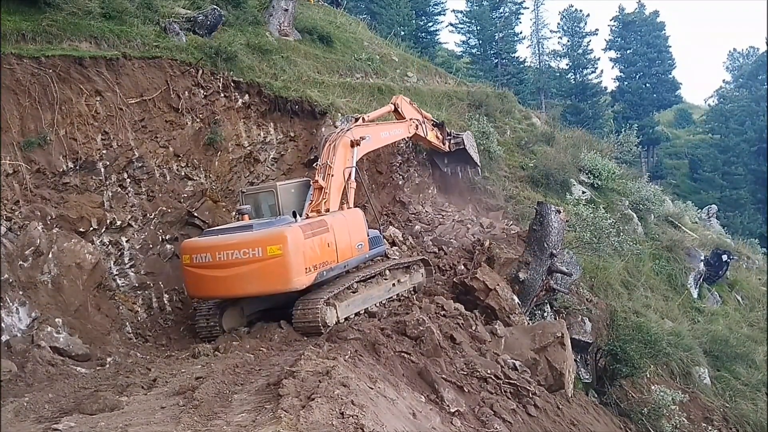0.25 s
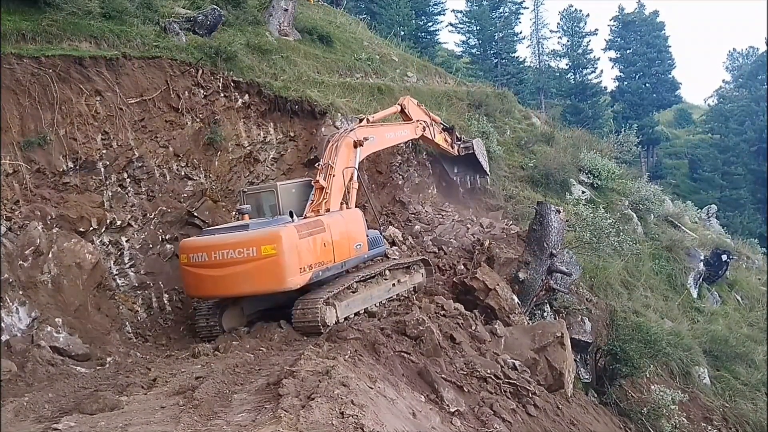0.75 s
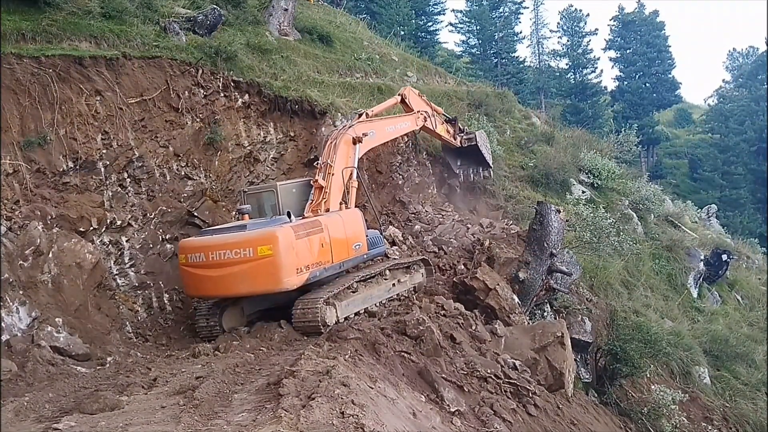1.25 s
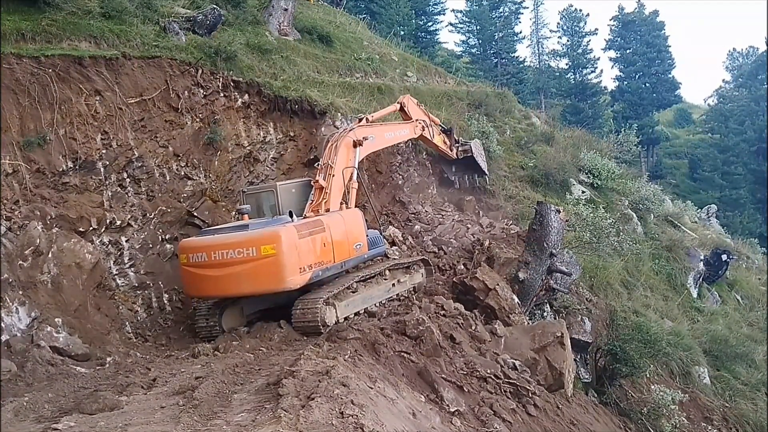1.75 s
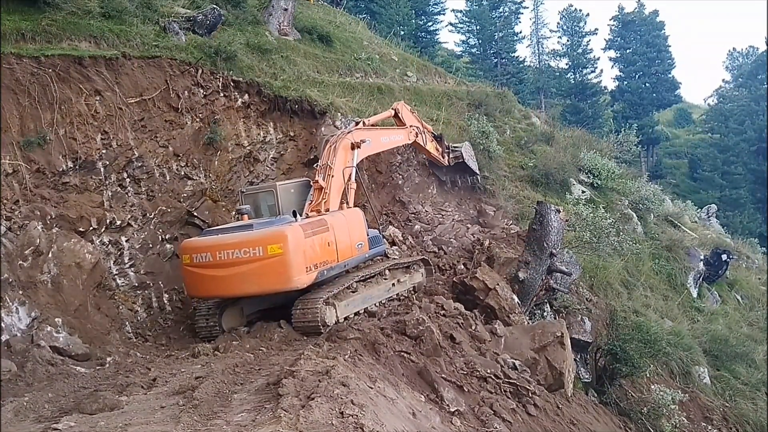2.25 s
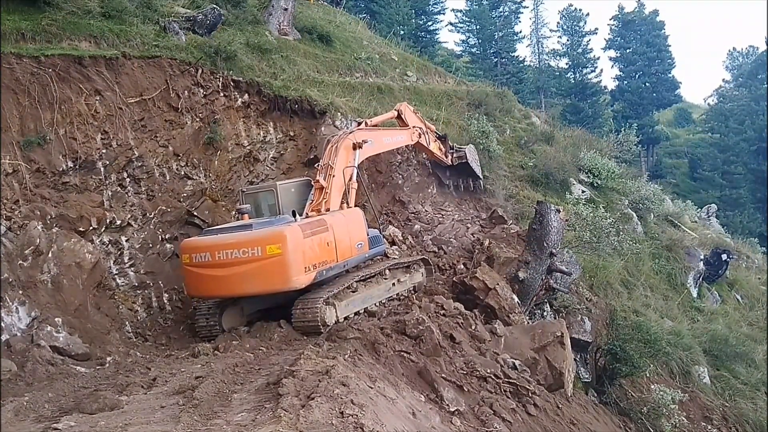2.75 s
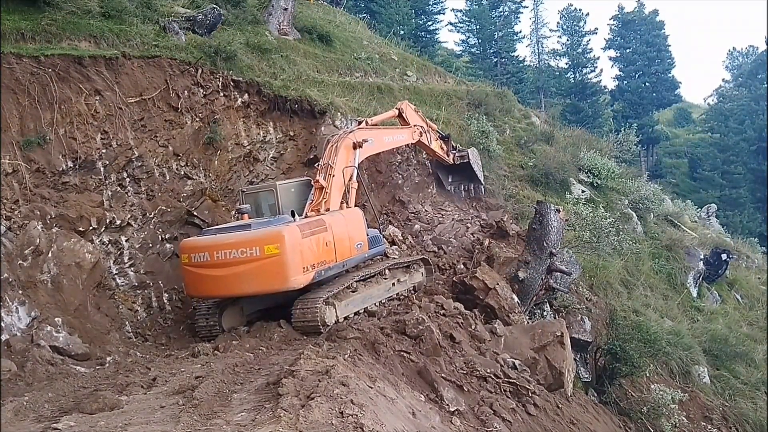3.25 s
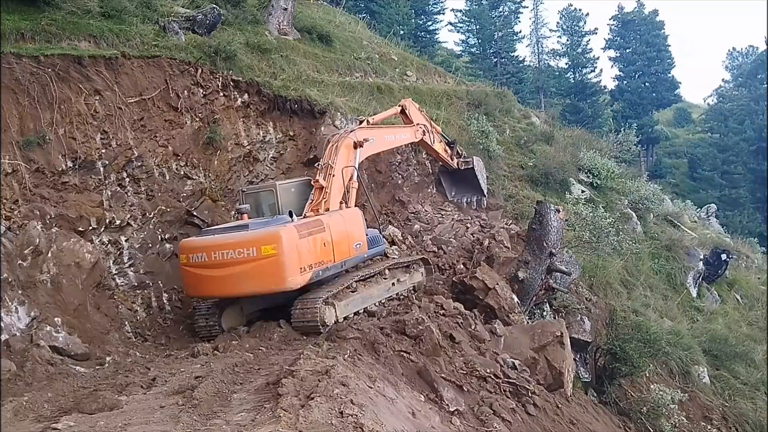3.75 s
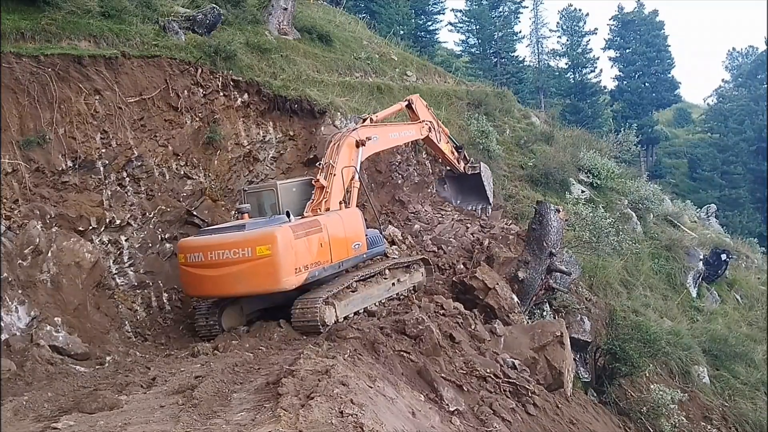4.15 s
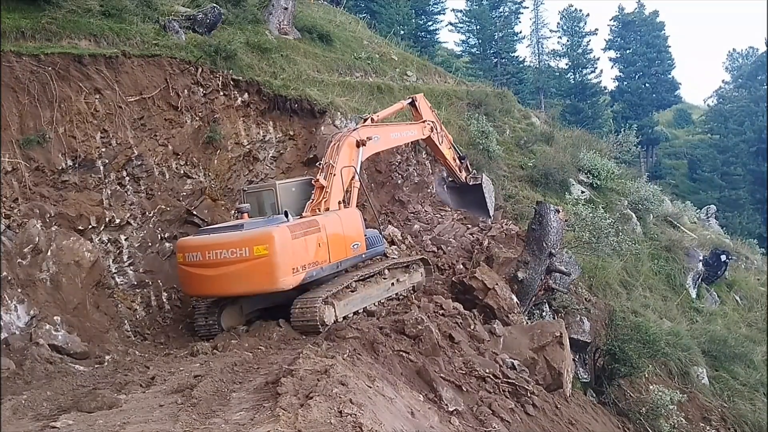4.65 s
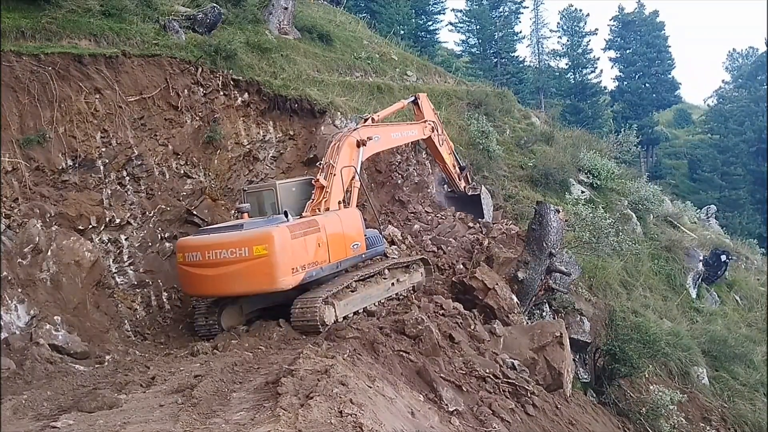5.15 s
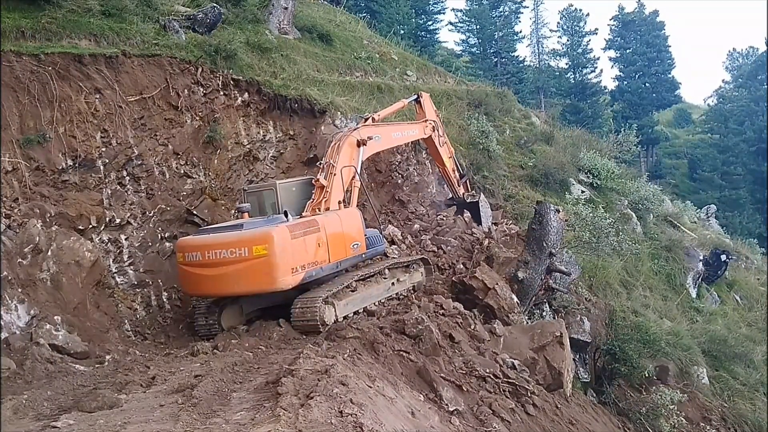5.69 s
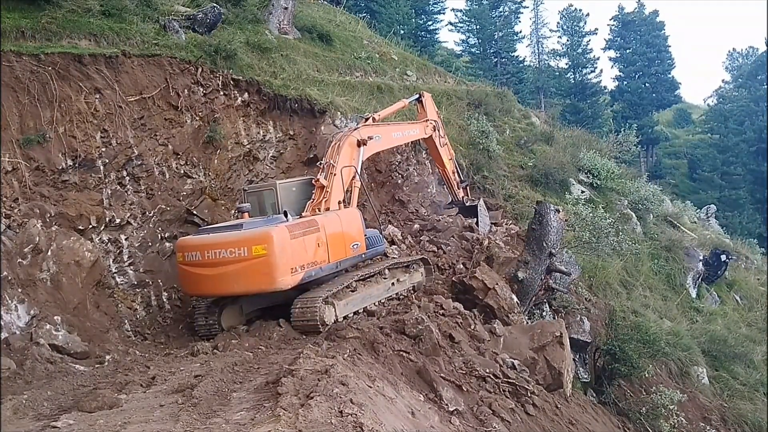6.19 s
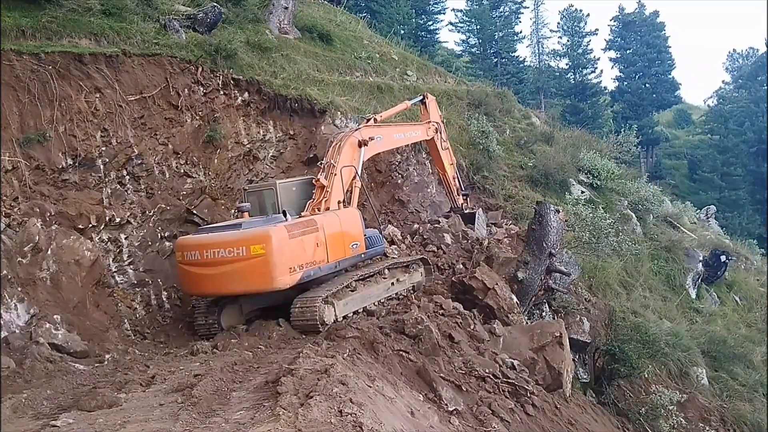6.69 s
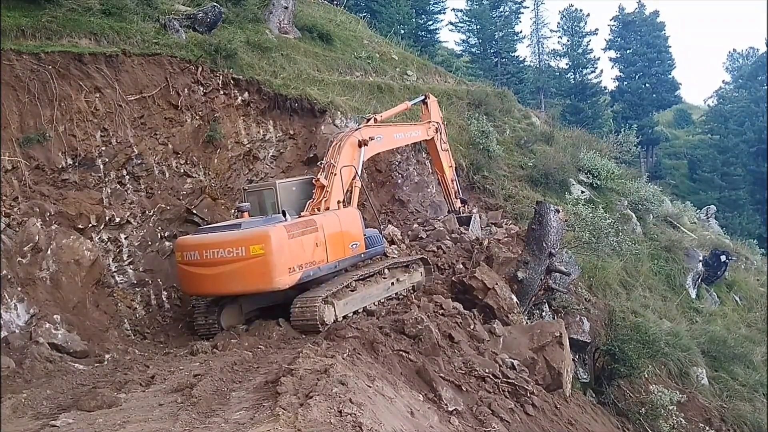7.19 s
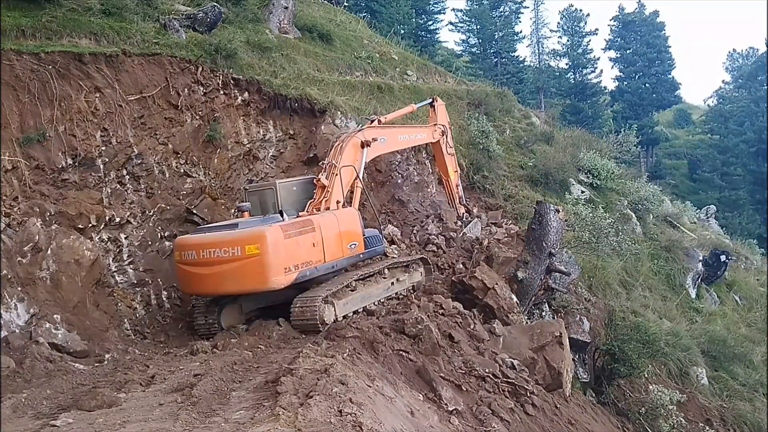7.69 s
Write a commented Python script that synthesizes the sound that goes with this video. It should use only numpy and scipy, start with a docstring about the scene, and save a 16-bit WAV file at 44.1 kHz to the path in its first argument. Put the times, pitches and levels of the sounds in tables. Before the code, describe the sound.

Outdoors by a cut earth bank, a loaded diesel engine growls continuously, its pitch sagging and recovering slightly. The bucket teeth scrape and groan through packed soil; stones crack, thud and clatter on dull-ringing steel in uneven bursts, heaviest around four to five seconds. Gravel trickles after each slide. Later the digging nearly stops and the engine dominates. Wide stereo pickup, some way from the machine, with brief rough echoes.

```python
"""A tracked excavator rakes rock out of an earth bank: diesel tones, exhaust noise, whines throughout.
Rocks knock on the steel bucket from 0.3 s, again near 1.1 s and from 2.5 to 3.4 s, thickest at 3.8-4.8 s,
then sparsely to 7.9 s. Knocks are noise bursts exciting resonances; stones, gravel and grit are random
impulses, filtered; earth is low noise; tooth strokes set the arm groaning. The exhaust dips near 7.4 s.
The slope scatters the digging as short noise echoes, the low rumble of earth excepted."""
import sys
import numpy as np
from scipy import signal
from scipy.fft import rfft, irfft, next_fast_len
from scipy.io import wavfile
from scipy.ndimage import uniform_filter1d

SR = 44100
rng = np.random.default_rng(int(sys.argv[2]) if len(sys.argv) > 2 else 0)


def wav_out(sig):
    """Save sig, one row per channel (or a flat mono array), as 16-bit PCM at SR to the path in sys.argv[1]."""
    wavfile.write(sys.argv[1], SR, np.round(np.clip(np.atleast_2d(sig).T, -1, 1) * 32767).astype(np.int16))


N = 349713
T = np.arange(N) / SR
SIZE = next_fast_len(N + SR, real=True)
HZ = np.maximum(np.arange(SIZE // 2 + 1) * SR / SIZE, 1)


def from_db(db):
    """Decibels to gain."""
    return 10 ** (np.asarray(db) / 20)


def rms_one(x):
    """Scale to unit power."""
    return x / np.sqrt(np.mean(x ** 2) + 1e-20)


def in_time(rows):
    """Each column of a (t, values) table, interpolated at every sample."""
    s, *columns = np.transpose(rows)
    return [np.interp(T, s, column) for column in columns]


def gains(points):
    """A (Hz, dB) table as gain at every FFT frequency, interpolated over log frequency."""
    hz, db = np.transpose(points)
    return from_db(np.interp(np.log(HZ), np.log(hz), db))


def colour(x, points):
    """Causal, minimum-phase filter with the given spectrum."""
    cepstrum = irfft(np.log(gains(points)), SIZE)
    # fold the cepstrum onto positive time
    cepstrum[1:SIZE // 2] *= 2
    cepstrum[SIZE // 2 + 1:] = 0
    response = np.exp(rfft(cepstrum))
    return irfft(rfft(x, SIZE) * response, SIZE)[..., :N]


def drift(rate_hz):
    """Smooth random wandering with spread 1: two-pole low-passed noise, run at SR / 40."""
    r = np.exp(-80 * np.pi * rate_hz / SR)
    noise = rng.standard_normal(N // 40 + 2002)
    slow = signal.lfilter([1], [1, -2 * r, r * r], noise)[2000:]
    return np.interp(np.arange(N) / 40, np.arange(len(slow)), rms_one(slow))


def resonate(x, hz, width_hz):
    """One two-pole resonance, gain 1 at its top."""
    r = np.exp(-np.pi * width_hz / SR)
    zeros = np.array([1, 0, -1]) * (1 - r * r) / 2
    poles = [1, -2 * r * np.cos(2 * np.pi * hz / SR), r * r]
    return signal.lfilter(zeros, poles, x + 1e-18)


def passband(x, hz, kind):
    """Second-order low- or high-pass."""
    sos = signal.butter(2, min(hz, .45 * SR), kind, fs=SR, output="sos")
    return signal.sosfilt(sos, x + 1e-18)


def brighten(x, gain):
    """First-order shelf that scales the part above 700 Hz."""
    dull = signal.lfilter(*signal.butter(1, 700, fs=SR), x)
    return dull + gain * (x - dull)


def grains(per_s, spread_db):
    """Random contacts of uneven size and sign, with about unit power at any rate."""
    sizes = from_db(spread_db * np.minimum(rng.exponential(1, N), 3)) * rng.choice([-1, 1], N)
    struck = rng.random(N) < per_s / SR
    return rms_one(sizes * struck / np.sqrt(per_s))


def swell(start_s, length_s, attack_s, release_s):
    """Envelope that rises exponentially to 1 at the start, holds, and dies away."""
    before_s = np.maximum(start_s - T, 0)
    after_s = np.maximum(T - start_s - length_s, 0)
    return np.exp(-before_s / max(attack_s, 1e-3) - after_s / max(release_s, 1e-3))


# engine speed, sagging as the bucket bites, overshooting as it comes free: t/s, firing rate/Hz
FIRING_RATE = [(0, 82), (0.25, 82.0), (0.5, 79.5), (0.75, 85), (1.3, 76.6), (1.55, 79), (1.9, 79.6),
               (2.4, 77), (2.9, 81), (3.08, 77.5), (3.35, 82.6), (3.6, 79.9), (4, 80.2), (4.6, 77),
               (5.2, 82), (5.9, 78), (6.55, 80.2), (7.6, 77)]
# clean tones; belt-driven parts sit between the orders: multiple of firing rate, level/dB, waver depth
ENGINE_TONES = [(1, -29, 0.43), (2, -36, 0.62), (2.22, -37.5, 1.8), (3.099, -46, 0.71), (4, -51.5, 0.64),
                (4.705, -44, .9), (5, -70, .5)]
HUNT_HZ, HUNT_RATE_HZ = 0.305, 2.7   # governor hunting about the speed
WAVER_DB, WAVER_RATE_HZ = 2, 11.4   # per unit of waver depth


def engine_tones():
    """Firing orders and belt-driven parts: sines locked to the firing rate, wavering in phase and level."""
    firing_hz, = in_time(FIRING_RATE)
    turns = np.cumsum(firing_hz + HUNT_HZ * drift(HUNT_RATE_HZ)) / SR
    tones = 0
    for multiple, db, waver in ENGINE_TONES:
        phase = 2 * np.pi * (multiple * turns + rng.random()) + .5 * waver * drift(4)
        level_db = db + WAVER_DB * waver * drift(WAVER_RATE_HZ)
        tones = tones + np.sqrt(2) * np.sin(phase) * from_db(level_db)
    return tones * np.array([[1], [0]])   # mid only


# engine load as exhaust level: t/s, relative level/dB
EXHAUST_LOAD = [(0, -23.5), (2.9, -25), (3.2, -23), (4.7, -22.5), (4.9, -25), (6.2, -25), (6.65, -21.5),
                (7.2, -25.5), (7.37, -31), (7.52, -23.5), (7.93, -22)]
# swells and slumps as the governor catches the load: t/s, level change/dB
EXHAUST_SURGES = [(.03, 2), (.61, 8), (.8, 7), (.91, -1.5), (1.05, -9), (1.38, 5.5), (1.71, 6.5), (1.8, -4),
                  (2.07, 9), (2.48, 6.5), (3.04, -5), (3.16, 8.5), (3.57, 2.5), (4.61, 6.5), (4.7, 3.5),
                  (5.28, 6.5), (5.75, 6.5), (6.58, 3.5), (6.83, -10)]
# exhaust pipe and silencer: f/Hz, width of one stage/Hz, relative level/dB
PIPE_MODES = [(139.4, 22.8, -8.5), (172.3, 25.4, -3.5), (240.4, 18.7, -12)]
SURGE_S = 0.027   # peak to 1/e of the dB change
THROB_DB, THROB_RATE_HZ = 1.47, 12.3   # random surging


def exhaust():
    """Gas noise booms in pipe and silencer; its short-term power is levelled, then set by the load."""
    load_db, = in_time(EXHAUST_LOAD)
    surge_db = sum(db * np.exp(-((T - s) / SURGE_S) ** 2) for s, db in EXHAUST_SURGES)
    throb_db = load_db + surge_db + THROB_DB * drift(THROB_RATE_HZ)
    gas = rng.standard_normal((2, N))
    boom = 0
    for hz, width_hz, db in PIPE_MODES:   # two stages in series: steep sides
        boom = boom + from_db(db) * resonate(resonate(gas, hz, width_hz), hz, width_hz)
    strength = np.sqrt(uniform_filter1d(boom[0] ** 2, size=3200) + 1e-12)
    return from_db(throb_db - 2.17) * boom / strength


# fan air and engine block: f/Hz, relative spectral level/dB
BLOCK_SPECTRUM = [(25, -10), (60, 2), (100, 1), (200, 3), (300, -5.5), (420, -5), (600, 2.5), (790, -2.5),
                  (880, -7), (1300, -7), (1900, -14.5), (2350, -24), (4200, -27.5), (9600, -27),
                  (11000, -42), (14000, -44)]


def fan_and_block():
    """Rushing clatter of fan and block: coloured noise, fluttering in level."""
    clatter = rng.standard_normal((2, N)) * from_db(1.0 * drift(46))
    return from_db(-30.5) * rms_one(colour(clatter, BLOCK_SPECTRUM))


# pump and turbo whines: f/Hz, width/Hz, relative level/dB
WHINE_BANDS = [(2585, 28, -48), (3110, 39, -53), (3534, 64, -53), (5330, 120, -58.5), (7000, 43, -53),
               (8120, 180, -53)]
WHINE_WAVER_DB, WHINE_WAVER_RATE_HZ = 2.2, 7.1


def whines():
    """Oil and intake air sing in narrow, restless bands: resonated noise of drifting level."""
    flow = rng.standard_normal((2, N))
    total = 0
    for hz, width_hz, db in WHINE_BANDS:
        level_db = db - 8.5 + WHINE_WAVER_DB * drift(WHINE_WAVER_RATE_HZ)
        total = total + from_db(level_db) * rms_one(resonate(flow, hz, width_hz))
    return total


# slides of spoil: t/s, length/s, relative stones level/dB, relative gravel level/dB, earth level/dB
SPOIL_SLIDES = [(0.306, 0.049, -24.5, -42, -29.5), (1.01, 0.2, -27, -42.5, -51),
                (1.93, .1, -33.5, -54, -51), (2.477, 0.072, -27, -43.5, -37),
                (2.692, 0.15, -21, -42.5, -36), (3.189, 0.15, -23.5, -44, -36),
                (3.428, 0.037, -28.5, -49, -37), (3.848, 0.1, -25.5, -53, -31.5),
                (3.993, 0.22, -24, -41, -36), (4.268, .15, -24.5, -45, -34), (4.464, .19, -22, -41.5, -34),
                (4.764, .17, -33, -69, -36), (5.126, .14, -27.5, -65, -50), (6.228, 0.064, -49, -45.5, -52),
                (6.695, 0.096, -50, -44, -60), (7.427, 0.061, -55, -44.5, -43),
                (7.847, .08, -29.5, -50, -44)]
SLIDE_ATTACK_S, STONES_SETTLE_S = 0.05, .06
GRAVEL_LAG_S, GRAVEL_SETTLE_S = 0.044, 0.17
EARTH_LAG_S, EARTH_SETTLE_S = 0.05, 0.27
STRAY_STONES_DB, STRAY_GRAVEL_DB, STRAY_EARTH_DB = -37, -53, -51   # the cut face never quite rests
STRAY_SWING_DB, STRAY_SWING_RATE_HZ = 2.5, 4


def slides():
    """Flow of stones, gravel, earth: gravel and earth follow the stones and settle later."""
    stray = from_db(STRAY_SWING_DB * drift(STRAY_SWING_RATE_HZ))
    stones = from_db(STRAY_STONES_DB) * stray
    gravel = from_db(STRAY_GRAVEL_DB) * np.sqrt(stray)
    earth = from_db(STRAY_EARTH_DB)
    for s, length_s, stones_db, gravel_db, earth_db in SPOIL_SLIDES:
        rolling = swell(s, length_s, SLIDE_ATTACK_S, STONES_SETTLE_S)
        trickling = swell(s + GRAVEL_LAG_S, length_s, SLIDE_ATTACK_S, GRAVEL_SETTLE_S)
        slumping = swell(s + EARTH_LAG_S, length_s, SLIDE_ATTACK_S, EARTH_SETTLE_S)
        # powers add
        stones = np.hypot(stones, from_db(stones_db) * rolling)
        gravel = np.hypot(gravel, from_db(gravel_db) * trickling)
        earth = np.hypot(earth, from_db(earth_db) * slumping)
    return stones, gravel, earth


def loose_earth(flow):
    """Slumping earth rumbles: noise between 37 and 73 Hz."""
    low = passband(rng.standard_normal((2, N)), 73, "low")
    return flow * rms_one(passband(low, 37, "high"))


# gravel hiss: f/Hz, relative spectral level/dB
GRAVEL_SPECTRUM = [(1500, -21), (3200, 11.5), (6000, 10.5), (9200, 10.5), (11000, -21), (14000, -62)]


def gravel_hiss(flow):
    """Many small contacts blur into a coloured hiss."""
    return flow * from_db(-5) * rms_one(colour(grains(1800, spread_db=9.5), GRAVEL_SPECTRUM))


# short bright spills: t/s, level/dB, rise/s, fade/s
GRIT_SPILLS = [(.385, -43, 0.023, 0.21), (.928, -35.5, 0.0033, 0.046), (2.585, -41.5, .003, 0.026)]


def grit():
    """Fine grit lands at once and patters away: dense contacts, 4.8-8.1 kHz."""
    level = sum(from_db(db) * swell(s, 0, rise_s, fade_s) for s, db, rise_s, fade_s in GRIT_SPILLS)
    sand = passband(grains(2500, spread_db=3), 4800, "high")
    return level * rms_one(passband(sand, 8100, "low"))


# strokes of the teeth through packed earth: t/s, length/s, relative level/dB
TOOTH_STROKES = [(.12, .023, -27.5), (0.292, .04, -27.5), (0.528, 0.019, -30), (1.055, 0.18, -30),
                 (2.524, 0.026, -28.5), (2.787, 0.041, -20.5), (2.897, 0.017, -29), (2.975, 0.028, -33.5),
                 (3.125, 0.053, -24), (3.246, .22, -28), (3.9, 0.049, -31), (4.014, 0.097, -25.5),
                 (4.36, 0.076, -25), (4.49, 0.021, -25.5), (4.667, 0.028, -26.5), (4.81, 0.12, -33.5)]
# groan of the loaded arm: f/Hz, width of one stage/Hz, relative level/dB
ARM_MODES = [(233.5, 92, 2.5), (297, 89, 1), (516, 107, 0), (574, 120, -1), (728, 130, -1),
             (1100, 390, -12)]
SCRAPE_ATTACK_S, SCRAPE_RELEASE_S = 0.057, 0.057


def dragging():
    """Uneven random slips of the teeth set the arm resonances groaning."""
    drag = 0
    for s, length_s, db in TOOTH_STROKES:
        drag = drag + from_db(db) * swell(s, length_s, SCRAPE_ATTACK_S, SCRAPE_RELEASE_S)
    slips = grains(490, spread_db=1.0)
    groan = 0
    for hz, width_hz, db in ARM_MODES:
        once = resonate(slips * drift(59), hz, width_hz)
        groan = groan + from_db(db) * resonate(once, hz, width_hz)
    return drag * from_db(0.5) * rms_one(groan)


AVERAGE_FLOW_DB, CONTACTS_PER_S = -25, 900   # contact rate at average flow
BARE_ROCK_DB, BARE_ROCK_POWER = -1.5, 0.35   # treble at average flow, its growth: more rock laid bare


def tumbling(flow):
    """Stones roll thicker and brighter as the slide grows."""
    size = flow / from_db(AVERAGE_FLOW_DB)
    contacts = grains(CONTACTS_PER_S * size ** .6, spread_db=5.0) * flow * from_db(-5.5)
    return brighten(contacts, from_db(BARE_ROCK_DB) * size ** BARE_ROCK_POWER)


# rocks on bucket and each other:
# t/s, relative level/dB, relative thud level/dB, relative crack level/dB, rock pitch f/Hz, crumble time/s
ROCK_KNOCKS = [(.129, -25.5, 9, -42, 630, 0.0047), (.283, -10, -15, -18, 1150, .004),
               (.3, -15.5, -17, -25, 694, .005), (.32, -17, 3, -33, 1100, .006),
               (.343, -21, -3, -30, 1100, 0.0037), (1.058, -11, -3, -15, 720, 0.0049),
               (1.08, -19, -4, -25, 620, 0.0036), (1.16, -15, -11, -4, 1500, 0.0048),
               (1.176, -11.5, -15, -32, 690, 0.0038), (1.212, -20, -12, -31, 700, 0.0034),
               (1.77, -24.5, -17, -25, 533, .008), (1.971, -18, -16, -28, 590, 0.0093),
               (2.52, -16.5, -18, -24, 536, 0.014), (2.679, -15, -5, -13, 1100, .008),
               (2.712, -21.5, 9, -9, 1170, .0072), (2.742, -23, 1, -6, 1300, 0.0056),
               (2.758, -12, 5, -14, 1300, .005), (2.777, -18, -2, -12, 1500, 0.0061),
               (2.804, -8.5, -4, -30, 593, 0.0053), (2.825, -16, 2, -13, 750, 0.0091),
               (2.866, -27, -6, -18, 800, .005), (2.888, -31, 12, -30, 640, 0.0065),
               (3.114, -20, -8, -28, 533, .004), (3.167, -15, -12, -28, 590, 0.003),
               (3.2, -21, -14, -30, 1200, .0054), (3.228, -15, -16, -21, 560, 0.0095),
               (3.262, -16.5, -12, -24, 1300, 0.006), (3.291, -21, 0, -26, 710, 0.0049),
               (3.331, -21, -7, -18, 1800, 0.0056), (3.356, -22, -4, -16, 1800, 0.0045),
               (3.844, -18.5, -7, -18, 701.7, 0.0028), (3.868, -16.5, -17, -21, 740, 0.0038),
               (3.897, -13.5, -23, -30, 1851, 0.0066), (3.975, -20, -6, -2.5, 690, 0.0081),
               (4.007, -10, 7, -11, 1200, 0.0044), (4.026, -6.5, 1.5, -12, 805, 0.0072),
               (4.06, -9, -4, -36, 1250, .007), (4.152, -11.5, -13, -18, 1120, 0.0059),
               (4.268, -10.5, -20, -37, 1255, 0.01), (4.301, -5, -10, -21, 986, 0.0058),
               (4.385, -13, -4, -11, 2003, .011), (4.43, -12.5, 2, -26, 600, 0.0087),
               (4.474, -4.5, -4, -9.5, 980, 0.0059), (4.497, -10, -13, -32, 636, 0.003),
               (4.519, -10, -8, -17, 1500, 0.0075), (4.556, -6, -6, -17, 1010, 0.0077),
               (4.581, -7, -7, -25, 800, 0.0057), (4.603, -12, -11, -14, 1500, 0.0067),
               (4.647, -6, -10, -13, 670, 0.006), (4.672, -9.5, -3, -31, 755, 0.0041),
               (4.762, -22.5, -6, -14, 1200, .005), (5.1, -19.5, -14, -11, 1580, 0.0032),
               (5.118, -19.5, -14, -18, 1580, 0.0049), (5.15, -19, -12, -25, 1100, 0.0035),
               (5.228, -21, -6, -22, 695, 0.0033), (5.243, -25, -15, -3, 1500, 0.0049),
               (6.062, -20.5, -14, -13, 4970, 0.0026), (6.295, -30, -12, -5, 3490, 0.0026),
               (7.85, -22, -14, -40, 1400, .009)]
CONTACT_DB = -20   # first bite, against the crumbling
CLACK_DB, CLACK_Q = 0, 5   # brief ring at the rock's own pitch
THUD_HZ, THUD_WIDTH_HZ = 303, 250
CRACK_HZ, CRACK_WIDTH_HZ = 2950, 1100


def knocks():
    """Each rock bites, crumbles in a swell of fractures, rings; gives force, and radiated thud plus crack."""
    force = np.zeros((3, N))
    t = T[:SR // 4]
    for s, db, thud_db, crack_db, hz, crumble_s in ROCK_KNOCKS:
        age = t / max(crumble_s, 1e-3)
        fractures = rng.standard_normal(len(t)) * (rng.random(len(t)) < 3500 / SR)
        chips = fractures * age ** .7 * np.exp(-age)
        blow = chips / np.sqrt(np.sum(chips ** 2) + 1e-12)
        blow[np.argmax(age >= .5)] += from_db(CONTACT_DB)
        clack = blow + from_db(CLACK_DB) * resonate(blow, hz, hz / CLACK_Q)
        parts = np.array([clack, from_db(thud_db) * blow, from_db(crack_db) * blow])
        at = round(s * SR)
        force[:, at:at + len(t)] += from_db(db) * parts[:, :N - at]
    thud = from_db(24.0) * passband(resonate(force[1], THUD_HZ, THUD_WIDTH_HZ), 650, "low")
    crack = from_db(20.5) * passband(resonate(force[2], CRACK_HZ, CRACK_WIDTH_HZ), 3900, "low")
    return force[0], thud + crack


# earth-damped bucket modes: f/Hz, relative level/dB, t60/s
BUCKET_MODES = [(286, -4.5, 0.41), (538, 6.5, 0.33), (578, 2, 0.22), (744, -2, 0.19), (1040, 6.5, 0.13),
                (1241, -1.5, 0.21), (1420, -7, 0.05), (1800, 1.5, 0.046), (2130, -10, .05),
                (2530, -6, 0.16), (3390, -16, 0.048)]


def bucket(blows):
    """Blows ring each steel mode with a separately wandering strength."""
    ring = 0
    for hz, db, t60_s in BUCKET_MODES:
        width_hz = np.log(1000) / (np.pi * t60_s)
        ring = ring + from_db(db) * np.sqrt(t60_s) * resonate(blows * drift(46), hz, width_hz)
    return ring


# broken rock: f/Hz, relative spectral level/dB
ROCK_SPECTRUM = [(60, -9), (230, 1), (310, -1), (410, -5.5), (540, 7.5), (640, 6.5), (750, 4), (885, -8),
                 (1020, -1.5), (1220, 0), (1520, -6.5), (1800, -5.5), (2050, -9), (2500, -16.5),
                 (2850, -21), (3450, -22.5), (4500, -28.5), (9000, -29.5), (11000, -50)]
ROCK_DB, BUCKET_DB, CRUNCH_DB = 16.5, 20, 7   # answer of rock, steel, fractures to a blow
KNOCK_DB, KNOCK_BRIGHT_DB = 13, 3   # bare rock on steel: hard, bright contact


def rock_on_steel(flow):
    """Rolling stones and knocks drive rock and bucket together."""
    force, crunch = knocks()
    blows = tumbling(flow) + from_db(KNOCK_DB) * brighten(force, from_db(KNOCK_BRIGHT_DB))
    rock = from_db(ROCK_DB) * colour(blows, ROCK_SPECTRUM)
    steel = from_db(BUCKET_DB) * bucket(passband(blows, 8200, "low"))
    return rock + steel + from_db(CRUNCH_DB) * crunch


def hillside(x, scatter_db, t60_s, count=12):
    """Mid and side: rock lands now here, now there; each spot has its own decaying spray of reflections."""
    t = T[:SR // 4]
    spots = np.array([drift(14.9) for _ in range(count)]) ** 3
    spots /= np.sqrt(np.sum(spots ** 2, axis=0)) + 1e-9
    spray = rng.standard_normal((count, 2, len(t))) * from_db(-60 * t / t60_s)
    spray /= np.sqrt(np.sum(spray ** 2, axis=2, keepdims=True))
    scattered = 0
    for here, echoes in zip(spots, spray):
        scattered = scattered + signal.oaconvolve((x * here)[None], echoes, axes=1)[:, :N]
    mid, side = scattered
    scatter = from_db(scatter_db)
    return np.array([(x + scatter * mid) / np.hypot(1, scatter), side])


def digging():
    """Rock, gravel, grit and arm scatter off the slope; the earth rumble is added unscattered."""
    rolling, trickle, slump = slides()
    dry_bank = rock_on_steel(rolling) + gravel_hiss(trickle) + grit() + dragging()
    return hillside(dry_bank, scatter_db=3.6, t60_s=0.12) + loose_earth(slump)


# stereo width: f/Hz, side gain before side_db/dB
SIDE_WIDTH = [(30, -20), (80, -10), (180, -31), (330, -7.5), (650, -16), (1300, -8), (2600, -2.5),
              (5000, -1), (14000, -4.5)]
# stereo balance: f/Hz, left minus right gain/dB
LEFT_LEAN = [(80, 0), (300, -1), (700, -1.5), (1250, -5.5), (2300, -0.5), (4200, 0.9), (14000, -1)]


def microphones(sound, side_db, lead_s):
    """Mid and side to left and right: width and balance vary with frequency, left leads by lead_s."""
    mid, side = rfft(sound, SIZE)
    side = side * gains(SIDE_WIDTH) * from_db(side_db)
    lean = np.sqrt(gains(LEFT_LEAN)) * np.exp(1j * np.pi * HZ * lead_s)
    return irfft(np.array([(mid + side) * lean, (mid - side) / lean]), SIZE)[:, :N]


def scene():
    """The machine's left channel leads slightly; the bank has no time lead."""
    engine = engine_tones() + exhaust() + fan_and_block()
    machine = microphones(engine + whines(), side_db=1.0, lead_s=.000055)
    bank = microphones(digging(), side_db=0.0, lead_s=0)
    return machine + bank


CUTOFF_HZ = 14200


def record(dry):
    """The highest peaks are rounded and the top is cut."""
    rounded = dry / (1 + dry ** 10) ** (1 / 10)
    return signal.sosfilt(signal.ellip(10, .2, 80, CUTOFF_HZ, fs=SR, output="sos"), rounded)


dry = scene()
out = record(dry)
wav_out(out)
```